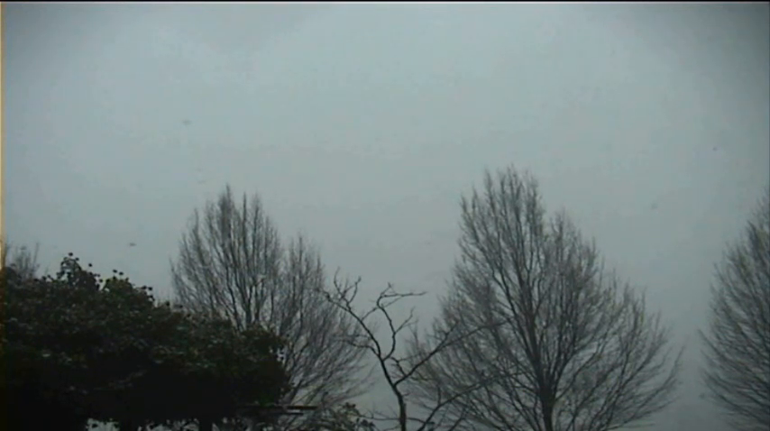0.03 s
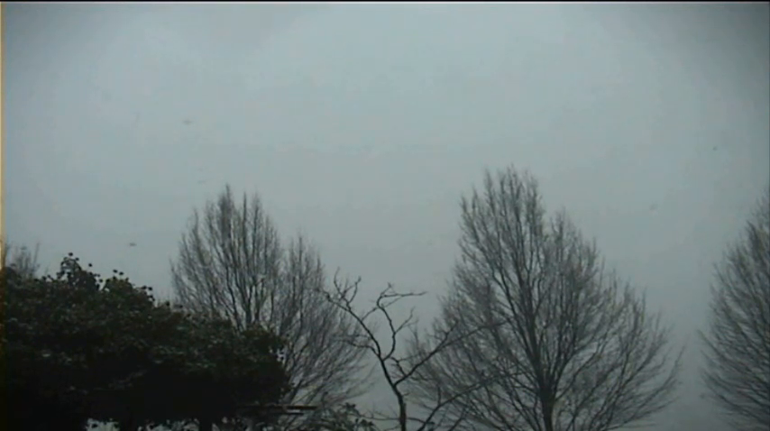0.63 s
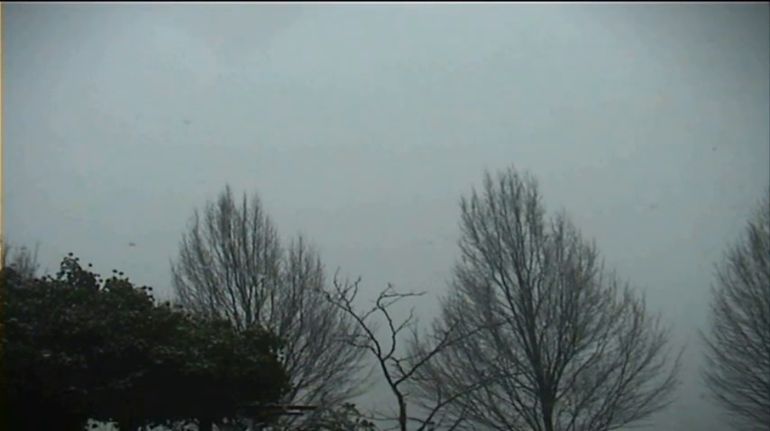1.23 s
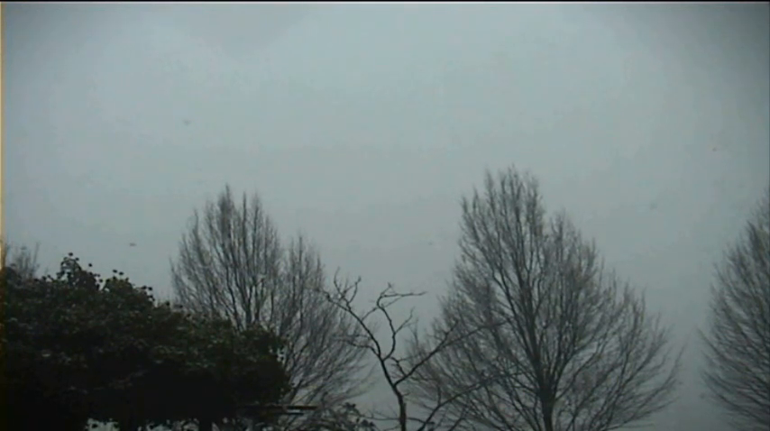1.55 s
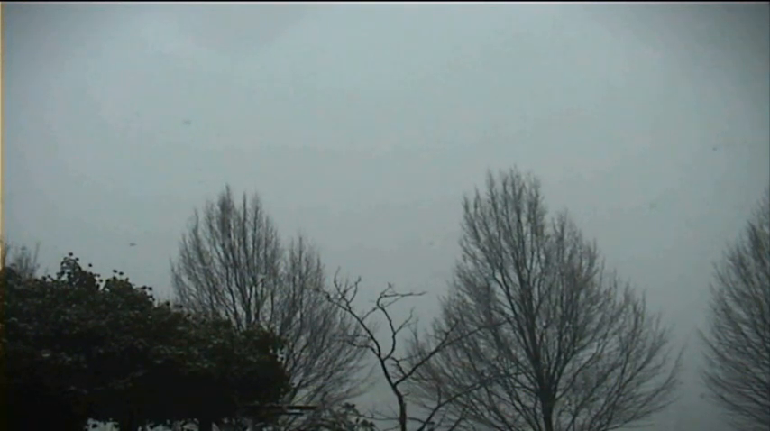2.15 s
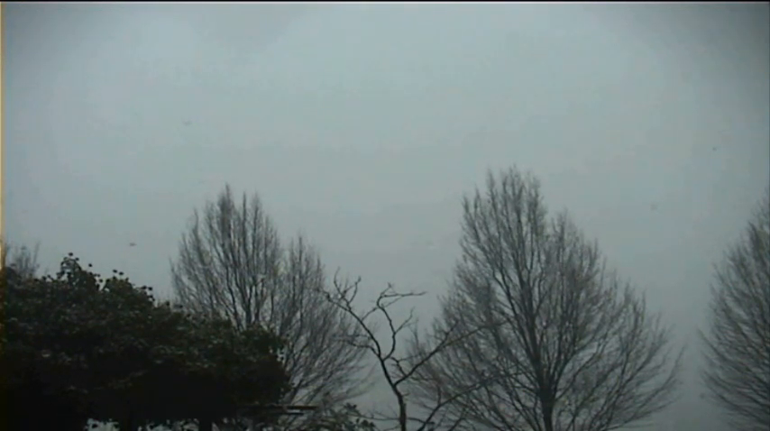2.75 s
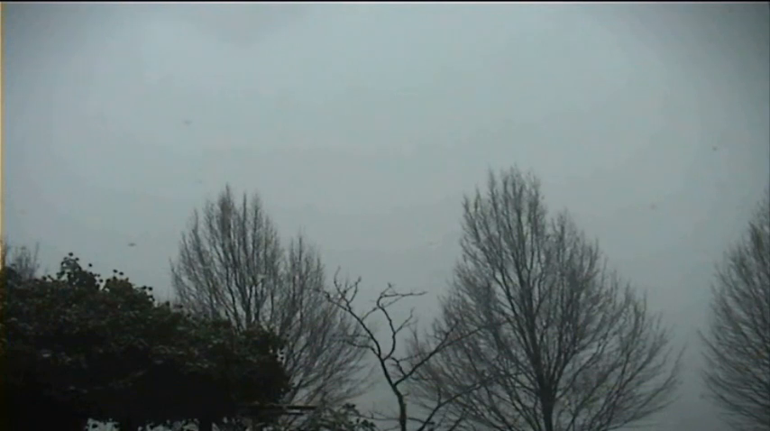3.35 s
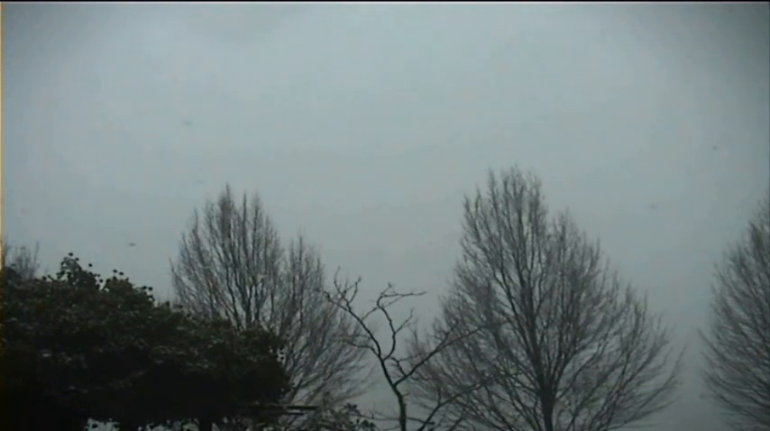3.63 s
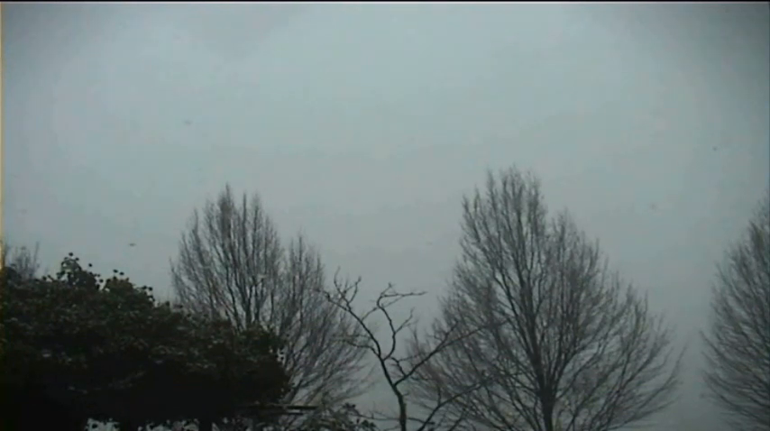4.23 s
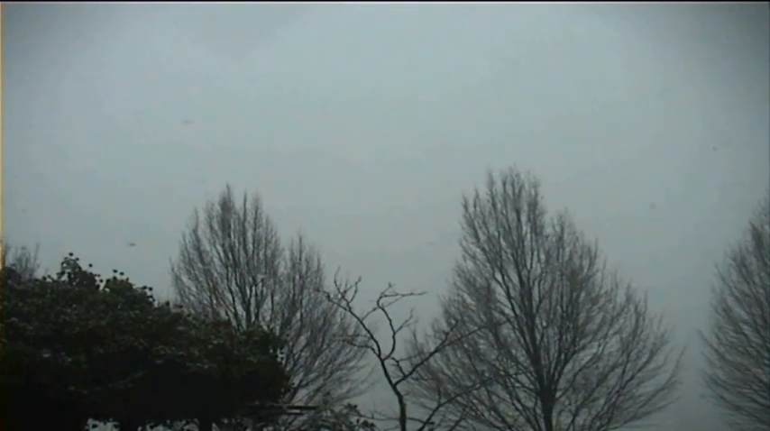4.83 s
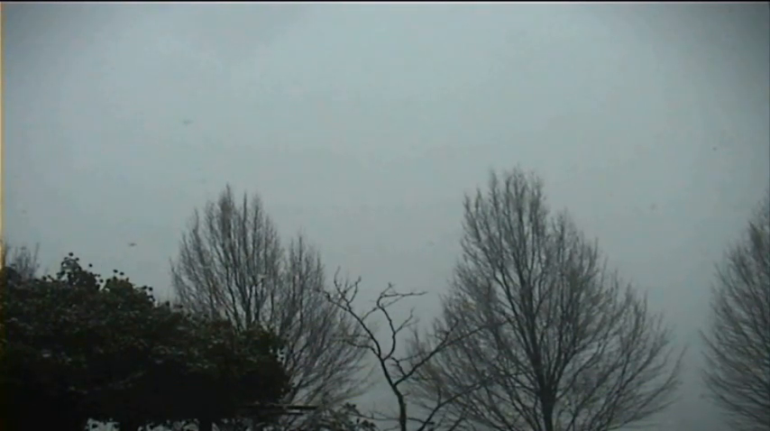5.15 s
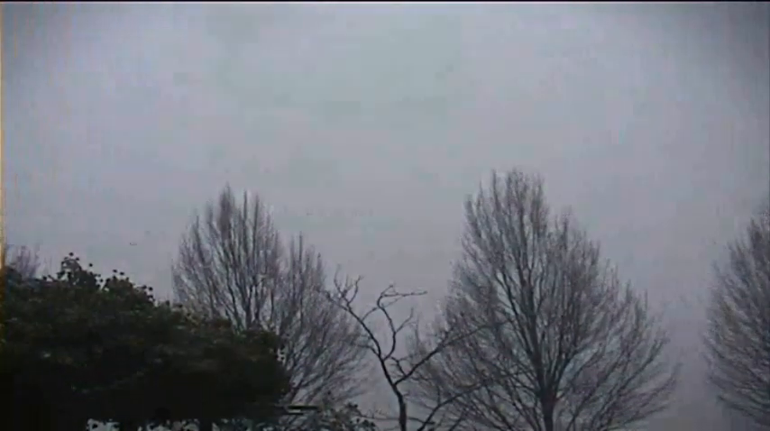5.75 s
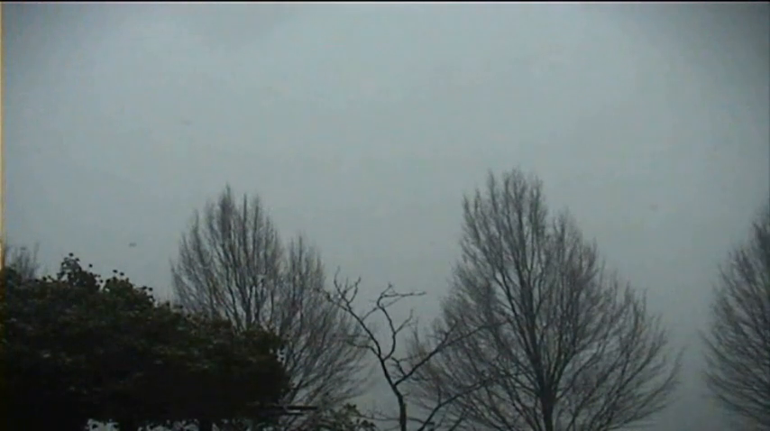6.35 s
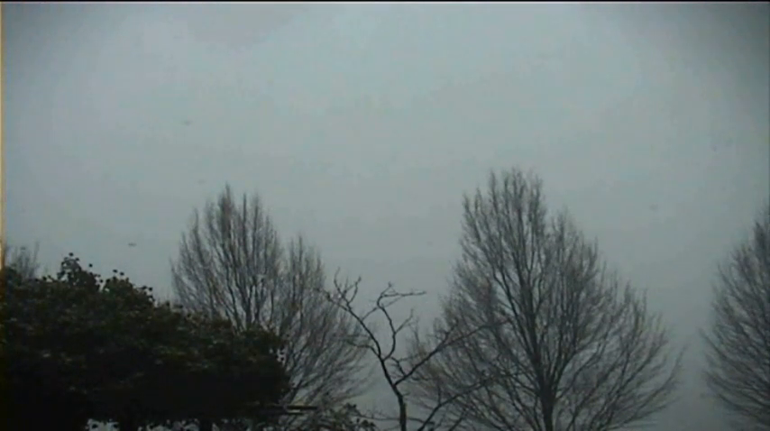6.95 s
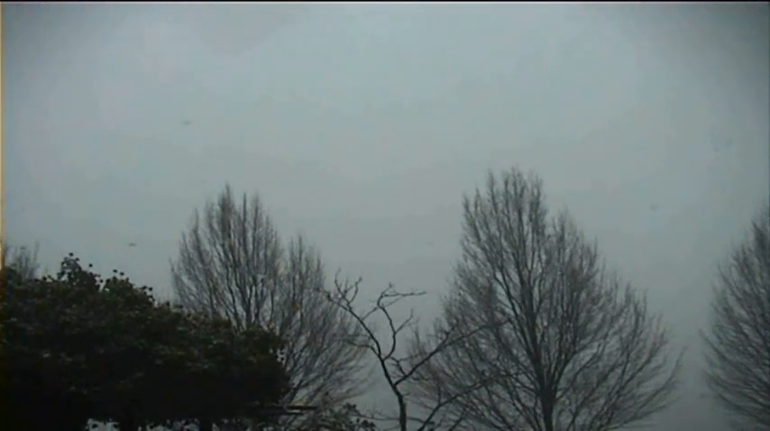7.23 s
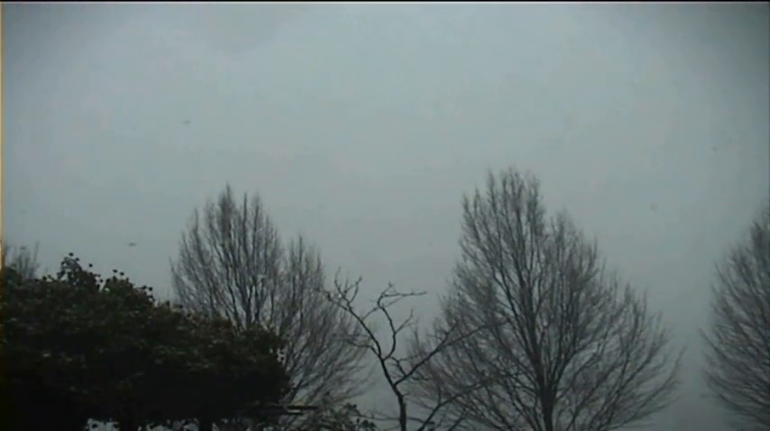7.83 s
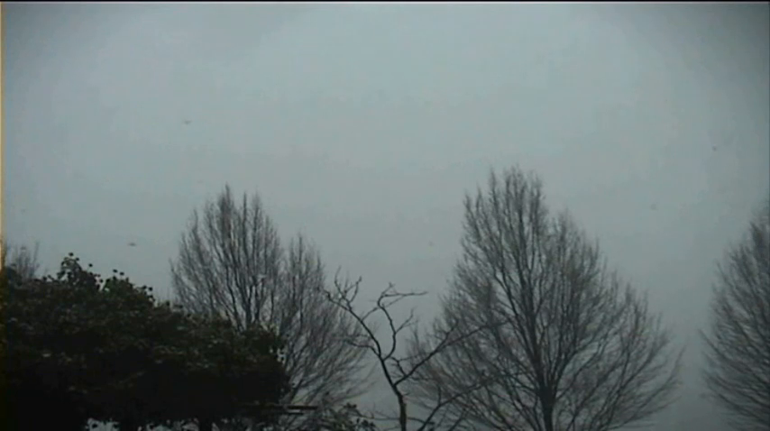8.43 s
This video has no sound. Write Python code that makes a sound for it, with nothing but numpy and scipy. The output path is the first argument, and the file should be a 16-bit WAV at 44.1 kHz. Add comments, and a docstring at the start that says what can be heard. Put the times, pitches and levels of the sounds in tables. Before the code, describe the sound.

Quiet hiss and a thin motor whine, then a sudden close thunderclap and heavy rolling rumble, heard indoors through a window.

```python
"""First a camera's hiss and thin motor whine, with a soft rustle, a faint far engine and one click on
the camera body. Then close thunder breaks in, heard from a room behind a window. Shock waves from the
crooked lightning channel land as a tearing clap that overloads the microphone, then as a long roll;
pane and room boom with them."""
import sys
import numpy as np
from scipy import signal
from scipy.fft import rfft, irfft
from scipy.io import wavfile
from scipy.ndimage import uniform_filter1d

SR = 44100
rng = np.random.default_rng(int(sys.argv[2]) if len(sys.argv) > 2 else 0)


def to_wav(s):
    """Save 16-bit WAV."""
    ch = np.atleast_2d(s).T  # columns
    pcm = np.round(np.clip(ch, -1, 1) * 32767)  # PCM
    wavfile.write(sys.argv[1], SR, pcm.astype(np.int16))


N = 374850
TIME = np.arange(N) / SR
HZ = np.maximum(np.arange(N // 2 + 1) * SR / N, 1)

# the clap's boom, crackle and bright edge, the treble opening last:
# (arrival t/s, rise/s, arrival level/dB, crest level/dB, fall/(dB/s), roll level/dB)
CLAP_LAYERS = [(6.555, 0.019, -14, -7, 24, -21), (6.572, 0.024, -22, -12.5, 32.5, -28),
               (6.59, 0.074, -27, -25, 24, -44.5)]
CREST_S = 6.76   # when the bulk of the channel is heard
# heavy shock fronts that punch out of the roll: (t/s, half-width/s, boom swell/dB, tearing swell/dB)
PEALS = [(6.501, 0.016, 5.5, 0), (6.628, 0.02, 4.5, -0.5), (6.715, 0.016, 1, 4), (6.747, 0.027, 4.5, 2.5),
         (6.817, 0.028, 4.5, 1.5), (6.887, 0.013, 5, 4), (6.953, 0.021, 8, 5), (7.084, 0.048, 10.5, 5),
         (7.22, .018, 4, 1), (7.276, 0.025, -2.5, 4), (7.437, 0.0077, 7.5, 2), (7.515, 0.034, 3.5, 3.5),
         (7.593, 0.041, 6, 5), (7.74, 0.061, 6, 1.5), (7.808, 0.013, 3.5, -0.5), (7.885, 0.046, 9, 5),
         (8.018, 0.015, 8.5, -2), (8.092, 0.012, 6, 0), (8.151, 0.036, 6, 3), (8.199, 0.018, 7, -0.5),
         (8.265, 0.049, 4.5, 2), (8.362, 0.049, 6.5, 1), (8.447, 0.037, 4.5, 0.5)]
# tone of the thunder after air and glass: (f/Hz, relative level/dB)
THROUGH_GLASS = [(20, -27), (55, -31), (85, -7), (120, -5.5), (165, 0), (228, -3.5), (262, -15.5),
                 (335, -18), (365, -22), (420, -28), (700, -22), (1150, -24), (1900, -24), (3300, -27),
                 (4500, -43.5), (8000, -58.5)]
# resonances of pane and room: (f/Hz, width/Hz, boost/dB)
PANE_MODES = [(83.8, 9.2, 3.5), (113.8, 6.8, 5.5), (213.7, 23, 5.5), (296.5, 38, 16), (459.7, 66, 19.5),
              (538, 28, 15), (616, 24, 9), (677, 29, 7.5), (824, 46, 3.5), (920, 360, 6), (1374, 290, 6.5)]
# the clap's first shock slaps the pane: (t/s, level/dB, t60/s)
PANE_SLAP = (6.578, -19, .35)
# stereo image of the thunder: (f/Hz, left-right correlation) and (f/Hz, left minus right/dB)
THUNDER_CORRELATION = [(25, .5), (55, .55), (85, .88), (160, .92), (290, .89), (370, .2), (480, .62),
                       (680, .68), (960, .33), (1400, .5), (2000, .35), (4000, .5)]
THUNDER_PAN = [(30, -6), (85, -4.4), (160, -3.9), (370, -3.7), (490, -.7), (680, -4.5), (1000, -2.7),
               (3000, -2.5)]

# contacts of a small part snapping home on the camera: (t/s, level/dB, low-pass f/Hz)
CLICK_CONTACTS = [(4.132, -5, 550), (4.1490, -6, 450), (4.1585, 4.5, 14000), (4.163, -8, 3000)]
# ring of the camera shell: (f/Hz, level/dB, t60/s, signed left gain, signed right gain)
SHELL_MODES = [(345, -27, 0.05, 0.025, 1), (407, -20.5, 0.079, 0.037, 0.95), (473, -13, 0.047, -0.24, 1),
               (876, -13, 0.046, -0.45, 0.91), (950, 4.5, 0.028, 0.26, -0.45),
               (1054, 2.5, 0.035, -0.72, 0.86), (1198, -13.5, 0.13, 0.036, 0.49),
               (1500, -11, 0.022, -0.63, -0.26), (1790, -17.5, 0.023, 0.93, 0.32),
               (2450, -25, 0.022, -1.5, -0.79), (3600, -26, 0.013, 0.73, 0.58)]
# tone of the click's noisy attack: (f/Hz, relative level/dB)
SNAP_EQ = [(300, 1), (460, -5), (690, -1), (920, 4), (1300, 5), (3000, -2), (5500, -7), (8000, -3),
           (11000, -12), (16000, -10)]

# a wash of rustling that ebbs and returns: (t/s, level/dB), and its tone: (f/Hz, relative level/dB)
RUSTLE_FADER = [(0, -37.5), (1.3, -44), (2.3, -40.5), (2.9, -51), (5.2, -68), (5.9, -39.5), (8.5, -38)]
RUSTLE_EQ = [(40, -10), (90, -18.5), (280, 3), (380, -5), (465, 3.5), (560, -4.5), (800, -2), (1500, -2),
             (3000, -14), (5500, -17), (8000, -47), (15000, -31)]
# soft brushes near the camera: (peak t/s, level/dB, release time constant/s)
BRUSHES = [(.575, -30.5, .035), (.765, -30.5, .05), (.965, -34.5, .14)]

# the far engine swells and drops back: (t/s, level/dB)
ENGINE_FADER = [(0, -47), (2.2, -51), (2.7, -39), (3.7, -39.5), (4.3, -33.5), (4.65, -35), (4.85, -47),
                (8.5, -56)]
# its harmonics: (multiple of the firing rate, relative level/dB)
ENGINE_ORDERS = [(1, -6.5), (3, -1.5), (6, -24.5)]

# tone of the quiet room and the camera hiss: (f/Hz, relative level/dB)
HISS_EQ = [(15, -36), (30, -3), (54, -3), (100, -4), (180, -7.5), (280, -7), (385, -12.5), (700, -13.5),
           (1100, -18), (1900, -17), (3000, -19.5), (5000, -22), (11700, -26.5), (15500, -31.5)]
# resonances of the camera body in its running noise: (f/Hz, width/Hz, boost/dB)
BODY_MODES = [(174, 30, 9), (460.8, 24.5, 12), (1015, 340, 10.5), (1460, 320, 4.5), (5000, 440, 1.5),
              (6430, 700, 3)]
# stereo image of hiss and rustle: (f/Hz, left-right correlation) and (f/Hz, left minus right/dB)
BED_CORRELATION = [(30, .35), (55, -.05), (85, .4), (220, .4), (290, -.35), (370, -.78), (520, -.58),
                   (1000, -.78), (1400, -.08), (3000, .05), (5500, .55), (9000, .5), (13000, .62)]
BED_PAN = [(30, -7), (55, -7.5), (100, -4), (220, -5), (300, -1.5), (650, -.3), (1000, -1.7), (3000, -.7),
           (6000, 0), (14000, -.2)]
# tones of the tape motor: (f/Hz, relative level/dB)
MOTOR_TONES = [(3978, -62), (4640, -65), (5050, -63), (5114, -59), (6304, -63), (6380, -66), (6568, -63),
               (9600, -65), (9900, -67), (10800, -67), (12000, -66), (15622, -69)]
# a bearing sings, fades and creeps back: (t/s, relative level/dB)
BEARING_FADER = [(0, -57.5), (1.3, -57.5), (1.6, -55), (3.7, -60.5), (4.6, -70), (8.5, -58)]


def thunder(absorption=0.43):
    """Each kink of the channel sends a shock; pane and room ring with boom, crackle and tearing edge."""
    boom_gain, crackle_gain, edge_gain = (clap_envelope(*layer) for layer in CLAP_LAYERS)
    swell_db, tear_db = peal_swells()
    shocks = impulses(per_s=2600, spread_db=-0.5)
    direct = rms_one(shocks + from_db(-10) * room(shocks, t60=0.23))
    inside = stereo(direct, room(shocks, t60=0.24), THUNDER_CORRELATION, THUNDER_PAN)
    inside = equalise(inside, over_hz(THROUGH_GLASS) + resonances(PANE_MODES))
    lows = cut(inside, 335, "low", order=6)
    upper = cut(inside, 310, "high", order=6)
    boom = levelled(lows, span_s=0.03) * (growl_envelope() + boom_gain) * from_db(swell_db)
    crackle = levelled(cut(upper, 1790, "low", order=5), span_s=0.026) * crackle_gain
    edge = levelled(cut(upper, 2270, "high", order=5), span_s=0.017) * edge_gain
    # weaker shocks come from farther up, and the air takes their treble
    treble_gain = (edge_gain / edge_gain.max()) ** absorption
    edge = cut(edge, 1990, "low", order=3) + treble_gain * cut(edge, 3800, "high", order=3)
    return boom + (crackle + edge) * from_db(tear_db) + pane_slap(upper)


def clap_envelope(arrival_s, rise_s, arrival_db, crest_db, fall_db_per_s, roll_db):
    """Gain of one layer: a sudden front, a climb to the crest, then a steady fall into the roll."""
    front = np.clip((TIME - arrival_s) / rise_s + .5, 0, 1)
    climb = np.clip((TIME - arrival_s) / (CREST_S - arrival_s), 0, 1)
    db = arrival_db + (crest_db - arrival_db) * climb - fall_db_per_s * np.maximum(TIME - CREST_S, 0)
    return np.hypot(from_db(db), from_db(roll_db)) * front


def growl_envelope(lead_s=0.11, start_db=-33, rise_db_per_s=75, fade_s=0.0099):
    """Gain of the low growl that builds just ahead of the clap, until the clap takes over."""
    clap_s = CLAP_LAYERS[0][0]
    since = np.clip(TIME - clap_s + lead_s, 0, lead_s)
    gate = np.clip(np.minimum(since, clap_s + fade_s - TIME) / fade_s, 0, 1)
    return from_db(start_db + rise_db_per_s * since) * gate


def peal_swells(tear_stretch=1.12):
    """Heavy fronts swell the boom and the tearing, in dB; the tearing lasts a little longer."""
    boom_db = sum(db * np.exp(-((TIME - s) / width) ** 2) for s, width, db, _ in PEALS)
    tear_db = sum(db * np.exp(-((TIME - s) / (width * tear_stretch)) ** 2) for s, width, _, db in PEALS)
    return boom_db, tear_db


def pane_slap(drive, attack_s=0.005):
    """The slapped pane rings in its middle modes and dies away."""
    start_s, db, t60 = PANE_SLAP
    since = np.maximum(TIME - start_s, 0)
    mids = cut(cut(drive, 520, "high", order=4), 720, "low", order=4)
    return levelled(mids, span_s=0.04) * from_db(db - 60 * since / t60) * np.minimum(since / attack_s, 1)


def room(x, t60):
    """Dense wall reflections smear a sound into a short reverb."""
    t = TIME[:SR // 2]
    tail = rng.standard_normal(len(t)) * from_db(-60 * t / t60)
    return rms_one(signal.fftconvolve(x, tail)[:N])


def click(snap_db=-13, snap_t60=0.021, tail_db=-33, tail_t60=0.35):
    """Contacts ring the camera shell; two close rocking modes beat, in opposite phase left and right."""
    t = TIME[:SR // 4]
    shell = sum(from_db(db - 60 * t / t60) * np.sin(2 * np.pi * hz * t) * np.array([[left], [right]])
                for hz, db, t60, left, right in SHELL_MODES)
    noise = rng.standard_normal((2, N)) + rng.standard_normal(N)
    snap = rms_one(equalise(noise, over_hz(SNAP_EQ)))[:, :len(t)]
    tail = rms_one(cut(cut(noise, 450, "high"), 1900, "low"))[:, -len(t):]
    snap *= from_db(snap_db - 60 * t / snap_t60)
    tail *= from_db(tail_db - 60 * t / tail_t60)
    contacts = sum(from_db(db) * cut((np.arange(N) == round(s * SR)) + 1e-18, hz, "low")
                   for s, db, hz in CLICK_CONTACTS)
    struck = signal.fftconvolve(contacts[None], shell + snap + tail, axes=1)[:, :N]
    return cut(struck, 220, "high", order=4)


def rustle(attack_s=0.066):
    """A faint wash of fine grains, and a few soft brushes that swell and die away."""
    direct = impulses(per_s=5000, spread_db=4.5)
    diffuse = impulses(per_s=4500, spread_db=1.5)
    grains = equalise(stereo(direct, diffuse, BED_CORRELATION, BED_PAN), over_hz(RUSTLE_EQ))
    brushes = sum(from_db(db) * np.exp(-np.maximum((s - TIME) / attack_s, (TIME - s) / release_s))
                  for s, db, release_s in BRUSHES)
    return rms_one(grains) * np.hypot(from_db(over_time(RUSTLE_FADER)), brushes)


def engine(start_hz=67.1, sag_hz_per_s=1.04, jitter=0.0069):
    """A far engine slowly loses speed; only its lowest orders get through the wall."""
    firing_hz = (start_hz - sag_hz_per_s * TIME) * (1 + jitter * drift(hz=31))
    phase = 2 * np.pi * np.cumsum(firing_hz) / SR
    hum = sum(from_db(db) * np.sin(order * phase) for order, db in ENGINE_ORDERS)
    waver_db = 1.4 * drift(hz=6)
    return hum * from_db(over_time(ENGINE_FADER) + waver_db) * from_db([[-3], [4]])   # leans right


def hiss(level_db=-36):
    """The bed: room rumble and the running noise of the camera, coloured by its body."""
    noise = stereo(*rng.standard_normal((2, N)), BED_CORRELATION, BED_PAN)
    noise = equalise(noise, over_hz(HISS_EQ) + resonances(BODY_MODES))
    return from_db(level_db) * noise / np.std(noise.mean(axis=0))


def motor_whine(flutter=0.00017, waver_db=2.5, bearing_hz=4545, capstan_hz=570):
    """Motor, bearing and capstan flutter together in pitch; each high tone wavers in level on its own."""
    motor_time = TIME + np.cumsum(flutter * drift(hz=2.8)) / SR
    tones = 0
    for hz, db in list(MOTOR_TONES) + [(bearing_hz, over_time(BEARING_FADER))]:
        gain = 2 * from_db(db + waver_db * drift(hz=1.3))
        tones += gain * np.sin(2 * np.pi * (hz * motor_time + rng.random()))
    capstan = from_db(-56.5) * np.sin(2 * np.pi * capstan_hz * motor_time)
    return tones + capstan * from_db([[-4], [3]])   # the capstan leans right


def drum_buzz(turn_hz=30, switch_hz=300, scrape_db=-49, ticks_db=-51.8, tick_decay_s=0.0016):
    """The camera's drum repeats one rough turn, and its drive ticks at each switching."""
    turn, switch = SR // turn_hz, SR // switch_hz
    sample = np.arange(N)
    scrape = rng.standard_normal(turn)[sample % turn]
    scrape = rms_one(cut(cut(scrape, 3350, "high"), 5600, "low"))
    ticks = rng.standard_normal(2 * switch)[sample % (2 * switch)]   # two ticks alternate
    ticks *= np.exp(-(sample % switch) / (tick_decay_s * SR))
    ticks = rms_one(cut(cut(ticks, 9300, "high", order=6), 13500, "low", order=4))
    return from_db(scrape_db) * scrape + from_db(ticks_db) * ticks


def impulses(per_s, spread_db):
    """Random spikes of either sign; the farther spread_db is from 0, the more uneven their sizes."""
    sizes = from_db(spread_db * np.minimum(rng.exponential(1, N), 4)) * rng.choice([-1, 1], N)
    return rms_one(sizes * (rng.random(N) < per_s / SR))


def stereo(direct, diffuse, correlation, pan):
    """Left and right share the direct sound and take the diffuse sound with opposite signs."""
    alike = np.clip(over_hz(correlation), -.99, .99)
    sides = np.array([[1], [-1]])
    both = np.sqrt(1 + alike) * rfft(direct) + sides * np.sqrt(1 - alike) * rfft(diffuse)
    return irfft(both * from_db(sides * over_hz(pan) / 2), N)


def levelled(x, span_s):
    """Hold the short-term level of a stereo sound at 1, keeping its fine grain."""
    size = int(span_s * SR)
    power = uniform_filter1d(uniform_filter1d(x.mean(axis=0) ** 2, size), size)
    return x / np.sqrt(np.abs(power) + 1e-20)


def equalise(x, db):
    """Minimum-phase EQ with the given gain per bin."""
    cepstrum = irfft(np.log(from_db(db)), N)
    cepstrum[1:N // 2] *= 2
    cepstrum[N // 2 + 1:] = 0
    return irfft(rfft(x) * np.exp(rfft(cepstrum)), N)


def resonances(modes):
    """Resonance peaks in dB at every frequency bin."""
    return sum(db / (1 + (2 * (HZ - hz) / width) ** 2) for hz, width, db in modes)


def cut(x, hz, kind, order=2):
    """Butterworth low- or high-pass."""
    return signal.sosfilt(signal.butter(order, hz, kind, fs=SR, output="sos"), x)


def drift(hz):
    """Smooth random wander at unit rms, mostly slower than hz."""
    return rms_one(irfft(rfft(rng.standard_normal(N)) / (1 + (HZ / hz) ** 4), N))


def over_time(points):
    """A fader curve at every sample."""
    return np.interp(TIME, *np.transpose(points))


def over_hz(points):
    """A curve over log frequency at every bin."""
    hz, value = np.transpose(points)
    return np.interp(np.log(HZ), np.log(hz), value)


def from_db(db):
    """Decibels to gain."""
    return 10 ** (np.asarray(db) / 20)


def rms_one(x):
    """Scale to unit rms."""
    return x / np.sqrt(np.mean(x ** 2) + 1e-20)


def scene():
    """Thunder over the quiet sounds of room and camera."""
    return thunder() + hiss() + motor_whine() + drum_buzz() + engine() + rustle() + click()


def record(dry):
    """The input stage rounds off peaks at full scale; a steep low-pass trims the top."""
    knee, cutoff_hz = 6, 15800
    rounded = dry / (1 + np.abs(dry) ** knee) ** (1 / knee)
    return signal.sosfilt(signal.ellip(10, .2, 80, cutoff_hz, fs=SR, output="sos"), rounded)


dry = scene()
out = record(dry)
to_wav(out)
```